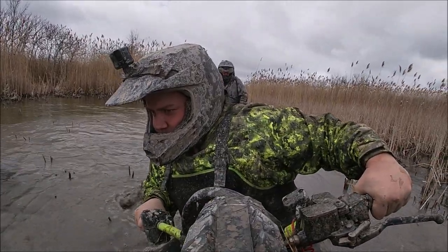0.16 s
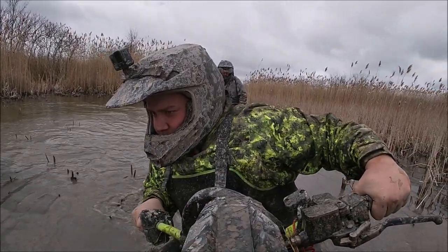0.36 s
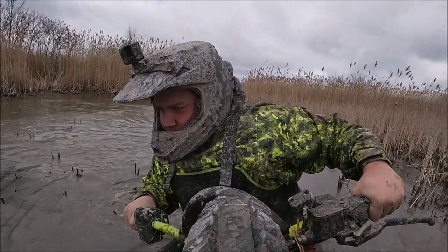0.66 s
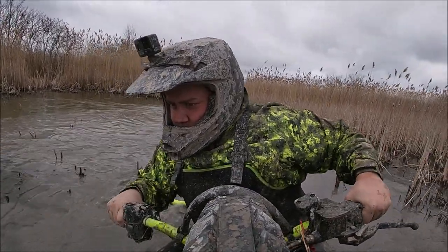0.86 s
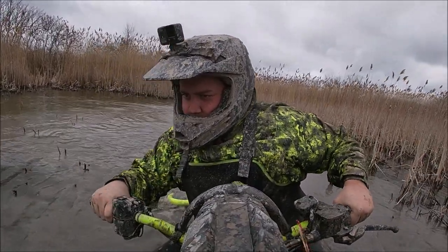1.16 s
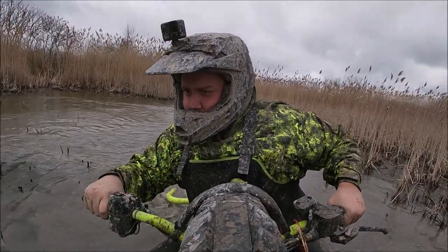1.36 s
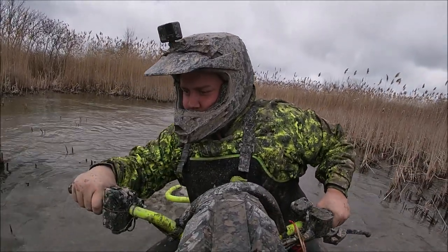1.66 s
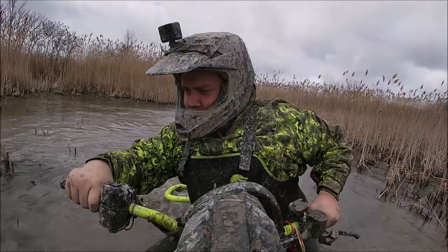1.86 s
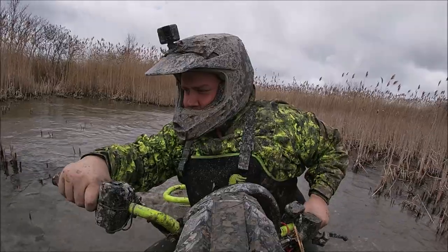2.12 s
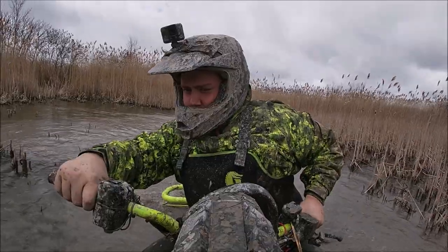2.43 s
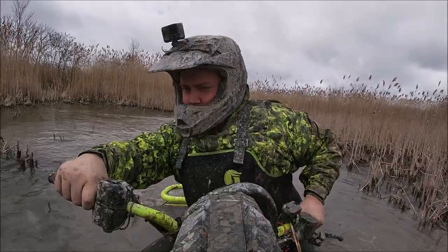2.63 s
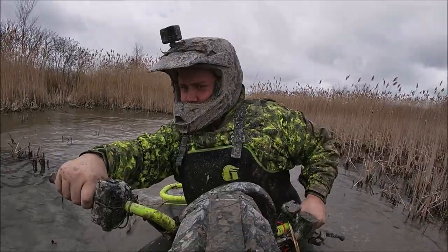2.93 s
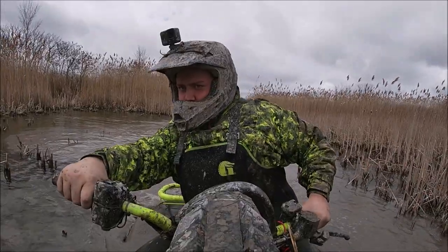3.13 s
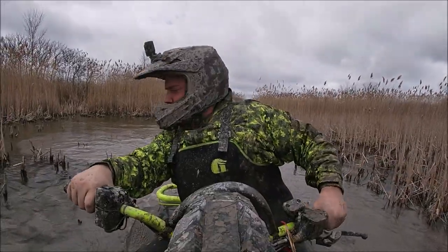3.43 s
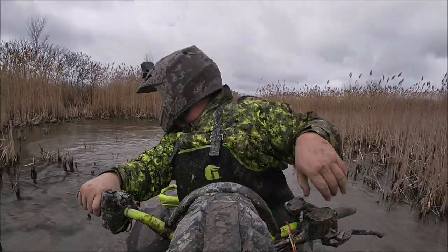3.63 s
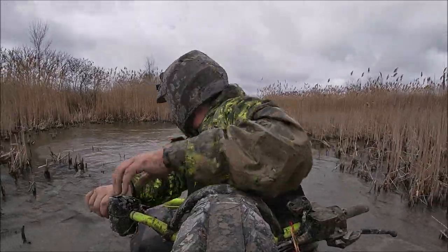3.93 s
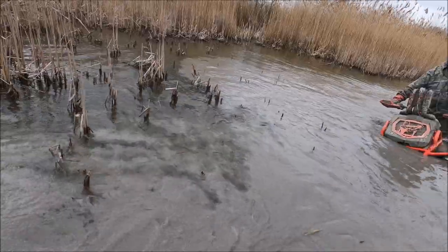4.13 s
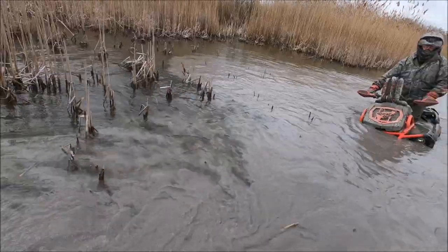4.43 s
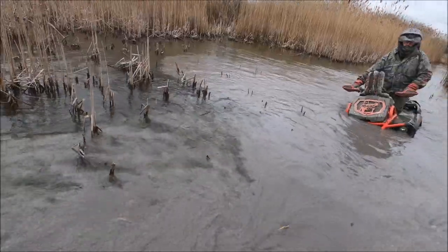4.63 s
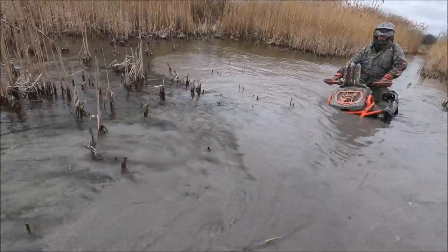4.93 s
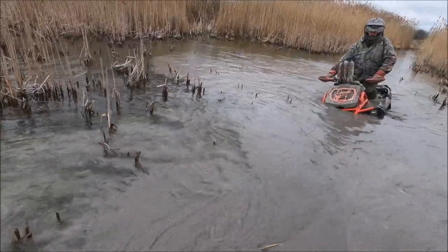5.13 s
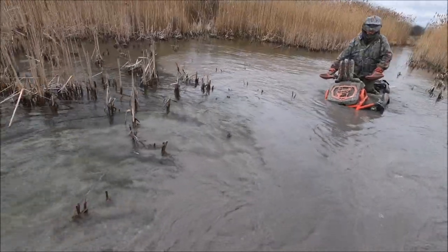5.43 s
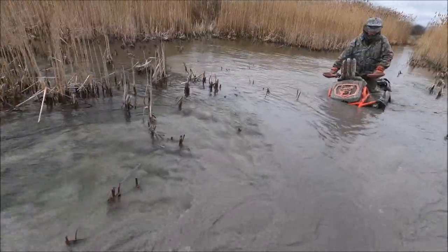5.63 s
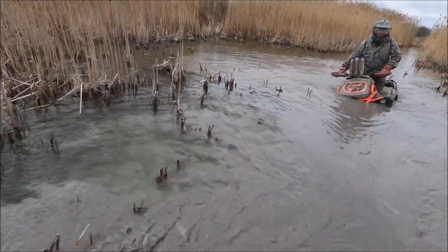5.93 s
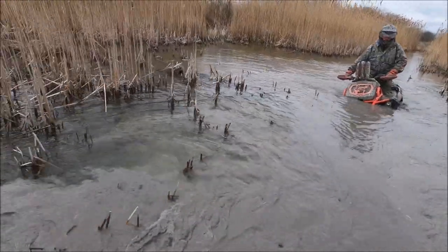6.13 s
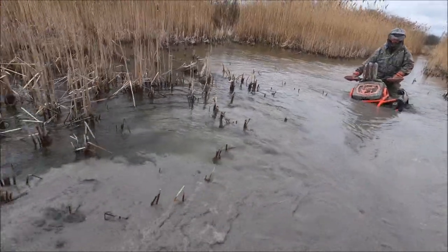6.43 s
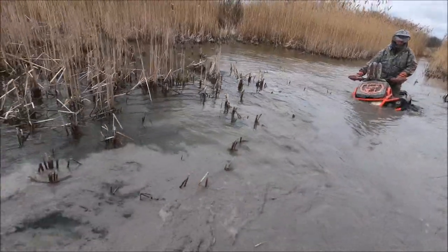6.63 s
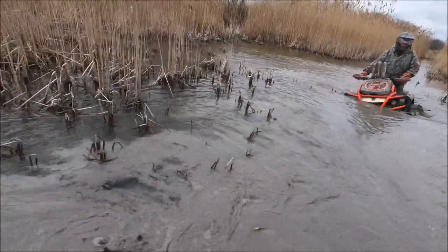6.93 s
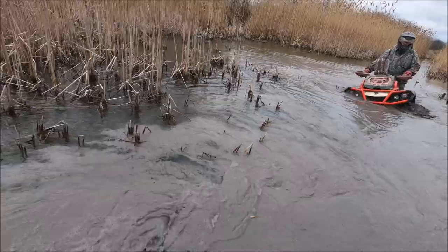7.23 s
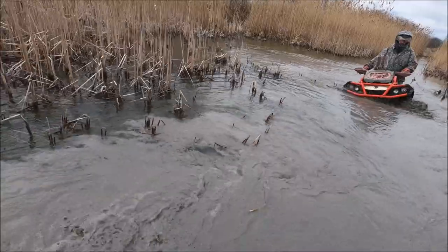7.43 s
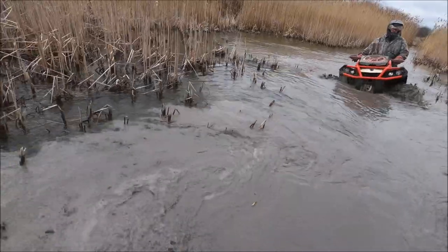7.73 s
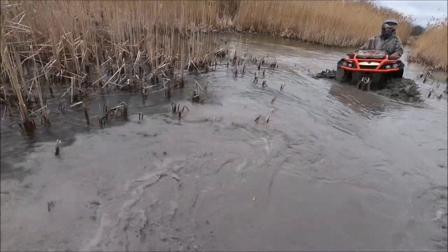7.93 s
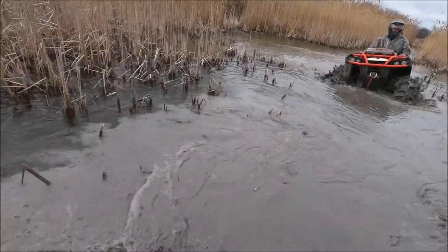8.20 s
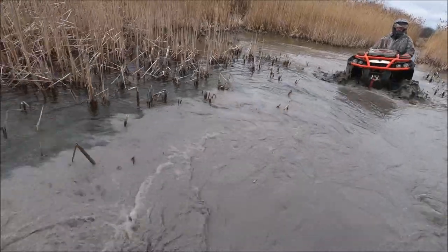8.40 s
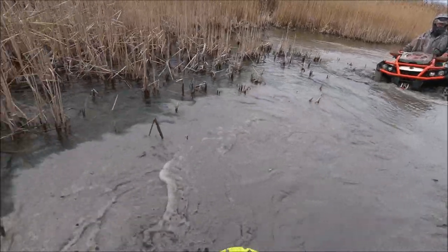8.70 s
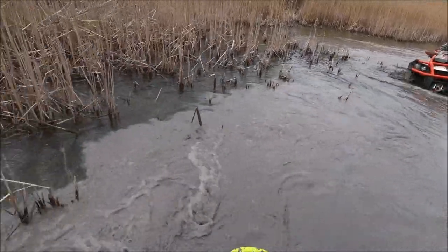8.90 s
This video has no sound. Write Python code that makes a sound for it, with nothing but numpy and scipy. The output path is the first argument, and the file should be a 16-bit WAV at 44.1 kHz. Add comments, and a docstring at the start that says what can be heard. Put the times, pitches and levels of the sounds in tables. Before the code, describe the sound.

A quad bike wades a reed-lined muddy pond. Heard from a microphone on the machine, its engine drones low and steady, the frame buzzing with a thin, slightly falling whine. After a sharp click, a second outdoor microphone takes over: the exhaust booms and barks more openly through water, with slosh, drips and spits. The engine briefly bogs down, recovers, then growls on at slightly lower speed with heavier splashing.

```python
"""A twin-cylinder quad bike wades through a muddy pond: pressure pulses timed by the engine cycle ring exhaust modes.
The throttle is nearly steady; stumbles delay the cycle and poor burns weaken single firings.
At first the microphone rides on the machine: its frame buzzes as resonant noise and a thin tone falls slowly.
Then, with a click, a second microphone takes over and the muffled exhaust barks more openly.
Shaped noise sloshes and sprays with the gas puffs; drops, spits, low rumble and faint echoes fill the rest."""
import sys
import numpy as np
from scipy import signal
from scipy.fft import rfft, irfft, next_fast_len
from scipy.io import wavfile
from scipy.ndimage import uniform_filter1d, minimum_filter1d, map_coordinates

SR = 44100
rng = np.random.default_rng(int(sys.argv[2]) if len(sys.argv) > 2 else 0)


def to_wav(sig):
    """Store sig (one row per channel, or 1-D mono) as 16-bit WAV at the path in sys.argv[1].

    Samples outside -1..1 are clipped; the rate is SR.
    """
    pcm = np.clip(np.atleast_2d(sig), -1, 1) * 32767
    pcm = np.round(pcm).astype(np.int16)
    wavfile.write(sys.argv[1], SR, pcm.T)  # frames by channels


N = 399546  # samples

SWITCH_S = 4.0409  # a second microphone takes over

# Engine speed before inertia. Each row: time in seconds, four-stroke cycles a second.
CYCLE_RATE = [(0, 33.57), (.3, 34.06), (.7, 32.55), (1.43, 30.93), (2.85, 31.21), (3.45, 29.63),
              (3.81, 30.58), (4.11, 29.68), (4.55, 30.53), (4.94, 31.22), (5.5, 30.23), (5.8, 30.77),
              (6.13, 32.38), (6.4, 28.01), (6.63, 22.4), (7.0, 28.42), (7.25, 30.85), (7.73, 28.46),
              (7.93, 28.92), (8.28, 27.45), (8.81, 27.31), (9.06, 26.49)]
# Three pressure pulses a cycle, each with a weaker answer. Each row: place in cycles, then the
# relative strength for boom, bark, crack and thud in dB.
PULSE_PATTERN = [(0.048, 6.5, 4, 2, 7), (0.233, -6, -9, -8, -19.5), (0.416, 13, 7, -7, 9.5),
                 (0.627, -27.5, -13.5, -4, -15), (0.701, 3.5, 0, -3, -1.5), (0.797, -24.5, -3, -11, -20.5)]
# Stereo difference. Each row: frequency in Hz, side against middle in dB.
SIDE_SPECTRUM = [(60, -29), (180, -27), (300, -26), (520, -23), (890, -17), (1520, -13), (2610, -11),
                 (5000, -9), (9000, -14)]


def amp(db):
    """Level and amplitude: 20 dB is a factor of ten."""
    return 10 ** (np.asarray(db) / 20)


def unit(x):
    """Normalisation by mean power: scales the whole signal to rms 1."""
    return x / np.sqrt(np.mean(x ** 2) + 1e-20)


def along(points, hz):
    """Logarithmic frequency scale: reads (Hz, value) points by interpolation."""
    f, v = np.transpose(points)
    return np.interp(np.log(hz + 1), np.log(f + 1), v)


def curves(rows):
    """Linear interpolation in time: one curve for each column after the seconds."""
    s, *cols = np.transpose(rows)
    return [np.interp(np.arange(N) / SR, s, c) for c in cols]


def bumps(rows, half_s):
    """Superposition of Gaussian humps, one for each (seconds, height) row."""
    return sum(height * np.exp(-((np.arange(N) / SR - s) / half_s) ** 2) for s, height in rows)


def wobble(rate):
    """Band-limited random fluctuation: a smooth curve through rate random knots a second."""
    knots = rng.standard_normal(int(N * rate / SR) + 4)
    return map_coordinates(knots, [np.arange(N) * rate / SR])


def filtered(x, response):
    """Linear filtering: the spectrum is multiplied by a complex response of frequency."""
    m = next_fast_len(N + SR // 2)
    return irfft(rfft(x, m) * response(np.fft.rfftfreq(m, 1 / SR)), m)[..., :N]


def modes(table):
    """Modal superposition: damped resonances (Hz, width Hz, dB) summed with alternating sign."""
    return lambda f: sum((-1) ** k * amp(db) * 1j * f * w / (c * c - f * f + 1j * f * w)
                         for k, (c, w, db) in enumerate(table))


def noise(response):
    """Partial coherence: independent middle and side noise, rms 1 in all, less alike in the treble."""
    both = lambda hz: response(hz) * [hz * 0 + 1, amp(along(SIDE_SPECTRUM, hz))]
    mid, side = filtered(rng.standard_normal((2, N)), both)
    return unit(np.array([mid + side, mid - side]))


def turns():
    """Phase is the integral of speed: engine cycles run through, with inertia and stumbles."""
    # The engine falls behind and catches up. Each row: time in seconds, cycles lost.
    stumbles = [(3.48, .045), (3.76, .025), (4.22, .035), (4.51, .03), (4.77, .03), (5.07, .035),
                (5.26, .02), (5.48, .025), (5.72, .022), (5.9, .03), (6.35, .025), (6.43, .025),
                (6.51, .028), (6.59, .03), (6.67, .028), (6.75, .025), (7.2, -.012), (7.56, -.018),
                (8.3, .012), (8.62, .015), (8.72, .028)]
    stumble_s, flywheel_s = .055, .14  # half length; inertia rounds off every change of speed
    start_cycles, skip_cycles = .12, .34  # the second microphone comes in further on in the cycle
    speed = uniform_filter1d(curves(CYCLE_RATE)[0], size=round(flywheel_s * SR))
    skip = skip_cycles * (np.arange(N) > SWITCH_S * SR)
    return start_cycles + np.cumsum(speed) / SR + skip - bumps(stumbles, stumble_s)


def firings(jitter, scatter_db):
    """Cyclic variation of combustion: sample, strength and place in the cycle of every pulse."""
    # Poor burns. Each row: time in seconds, change of pulse strength in dB.
    misses = [(1.618, -7.5), (2.264, -7.5), (2.902, -8), (3.047, -17.5), (3.451, -9), (4.732, -6.5),
              (5.051, -9.5), (5.214, -7.5), (5.641, -10), (6.066, -8.5), (6.267, -8.5), (6.87, -9.5),
              (8.354, -2)]
    cycles = turns()
    places = (np.arange(int(cycles[-1]))[:, None] + np.transpose(PULSE_PATTERN)[0]).ravel()
    chance = rng.standard_normal((len(places), 2))
    s = np.interp(places + jitter * chance[:, 0], cycles, np.arange(N) / SR)
    db = scatter_db * chance[:, 1]
    for when, miss_db in misses:  # weakens the pulses of about one cycle
        db = db + miss_db * np.exp(-((s - when + 0.0005) / 0.017) ** 2)
    at = np.round(s * SR).astype(int).clip(0, N - 1)
    heard = (s > 0) * (abs(s - SWITCH_S) > 2 / SR)  # none right at the switch
    return at, amp(db) * heard, np.arange(len(s)) % len(PULSE_PATTERN)


def exhaust():
    """Impulse excitation of resonators: pulses ring the pipe; also returns bare pulses and gas puffs."""
    # Level of each mode. Each row: time in seconds, then low boom, high boom, low bark, high bark
    # and crack in dB.
    main_levels = [(0, -34, -35, -42.5, -44, -41), (.9, -33, -37.5, -43, -44.5, -41.5),
                   (1.401, -53.5, -39, -42, -45.5, -46), (2.001, -35.5, -32.5, -49, -40, -42),
                   (2.501, -23.5, -36.5, -51.5, -42.5, -50.5), (3.1, -19.5, -38.5, -38, -39.5, -48),
                   (3.451, -18.5, -21.5, -38.5, -38, -65), (3.56, -20.5, -19.5, -45, -25.5, -65),
                   (4.02, -26, -18.5, -29, -30, -50.5), (4.099, -20, -17, -28, -33, -53),
                   (4.6, -24, -14, -30.5, -33.5, -48.5), (5.2, -25, -17, -26.5, -30, -52.5),
                   (5.501, -23.5, -18.5, -35, -23.5, -51), (6.25, -28.5, -18, -30.5, -28.5, -58.5),
                   (6.5, -25.5, -25, -26, -25, -62.5), (6.9, -24, -22, -24, -22, -44),
                   (7.05, -22.5, -25, -42.5, -24.5, -34), (7.75, -20.5, -28, -34, -27.5, -34.5),
                   (8.4, -24, -32.5, -29, -24.5, -41.5), (9.06, -21.5, -25, -25, -24.5, -46.5)]
    # Each row: time in seconds, then dull thud, middle bark and low, middle and high growl of the
    # pipe mouth in dB.
    growl_levels = [(0, -53, -53, -39.5, -62.5, -60.5), (3.2, -44, -45.5, -58.5, -57, -60.5),
                    (3.6, -42, -39.5, -54.5, -63.5, -73.5), (4.2, -37.5, -34.5, -49.5, -62.5, -67.5),
                    (4.7, -50.5, -34, -46, -61, -69.5), (5.2, -46, -34, -55.5, -60, -69),
                    (5.5, -54, -33.5, -61.5, -62, -57.5), (6.2, -42, -31.5, -59, -62.5, -62),
                    (6.6, -59, -39.5, -60.5, -64, -71), (7.0, -29.5, -32, -34.5, -59, -46),
                    (7.45, -41.5, -35, -35.5, -57.5, -53), (7.65, -38.5, -32, -38.5, -50, -63),
                    (8.1, -30.5, -32.5, -38, -42, -46.5), (8.35, -37, -32.5, -44.5, -72, -58.5),
                    (9.06, -36, -34.5, -36.5, -57, -44)]
    # Two booms of the silencer, two barks of the tail pipe, the crack of its mouth, before the
    # response is squared. Each row of a mode: centre in Hz, width in Hz, strength in dB.
    pipe_modes = [
        [(193.8, 36.6, -1)],
        [(228.9, 61.7, -1)],
        [(287, 190, -4), (342.4, 112, 6)],
        [(453.8, 96, 5), (604, 260, -14)],
        [(806, 340, 9.5), (1070, 510, 3), (1750, 3900, -11.5)],
    ]
    # Modes of the thud, middle bark and growls, with the same columns.
    mouth_modes = [
        [(341, 150, 0)],
        [(404, 160, 0)],
        [(682, 170, 0)],
        [(820, 170, 0)],
        [(1020, 240, 0)],
    ]
    # How far each mode speaks ahead of the pulse, in seconds.
    ahead = [.0035, .003, .0045, .0012, .0012, .0045, .003, .001, .001, .001]
    # Pulse balance. Each row: time in seconds, bark and crack of the second pulse in dB, bark, crack
    # and thud of the third pulse in dB, boom of the third pulse in dB.
    lead = [(0, -3, -1, -4.5), (3.502, -3, -2.5, -1.5), (4.599, -11, 0.5, -2), (6.201, -5.5, -9.5, -11.5),
            (6.449, -3.5, -1.5, -4.5), (6.949, -7, 2, 2), (7.151, -3, -11.5, -13), (7.9, -2.5, -1, -4),
            (8.301, -9.5, 2.5, -4), (9.06, -10, 1.5, -6.5)]
    # The third pulse and its answer come sooner. Each row: time in seconds, advance in cycles.
    third_early = [(0, 0), (6.2, 0), (6.9, .02), (7.2, .005), (8, .005), (8.4, .012), (9.06, .012)]
    # The pipe mouth clears the water and the crack and upper growls lift, or dip where negative.
    # Each row: time in seconds, lift in dB.
    flares = [(4.37, 11), (4.89, 9.5), (5.25, 8.5), (5.44, 3), (5.62, 9.5), (5.82, 14), (5.9, 6.5),
              (5.995, 9.5), (6.22, -5), (7.9, 2.5), (8.12, 0), (8.78, 7.5)]
    # The high boom swells briefly. Each row: time in seconds, lift in dB.
    swells = [(.7, 6), (.95, 15.5), (3.0, 22), (3.27, 9)]
    flare_s, swell_s = 0.036, 0.026  # half lengths
    unsteady_db = 1.3  # each mode swells and sinks on its own as the water laps at the pipe
    bark_scatter_db, crack_scatter_db, puff_scatter_db = 2, 1.6, 1.5  # from pulse to pulse

    at, size, place = firings(jitter=.002, scatter_db=1.2)
    pair = place // 2  # a pulse and its answer
    second_db, third_db, boom_db = (c[at] * (pair == k) for k, c in zip([1, 2, 2], curves(lead)))
    soon = curves(third_early)[0][at] * (pair == 2)
    at = (at - np.round(soon * SR / curves(CYCLE_RATE)[0][at]).astype(int)).clip(0, N - 1)
    balance_db = [boom_db, second_db + third_db, second_db + third_db, third_db]
    boom, bark, clean, thud = size * amp(np.transpose(PULSE_PATTERN)[1:, place] + balance_db)
    bark = bark * amp(bark_scatter_db * rng.standard_normal(len(at)))
    crack = clean * amp(crack_scatter_db * rng.standard_normal(len(at)))

    out = np.zeros(N)
    levels = np.array(curves(main_levels) + curves(growl_levels))
    levels[1] += bumps(swells, swell_s)
    levels[[4, 8, 9]] += bumps(flares, flare_s)  # crack, middle and high growl
    strengths = (boom, boom, bark, bark, crack, thud, bark, clean, clean, clean)
    for table, db, strength, ahead_s in zip(pipe_modes + mouth_modes, levels, strengths, ahead):
        ring = modes(table)
        rounded = lambda f: 1 / (1 + 1j * f / (2.34 * table[-1][0])) ** 3  # water blunts the front
        advance = lambda f: np.exp(2j * np.pi * f * ahead_s)
        response = lambda f: ring(f) ** 2 * rounded(f) * advance(f)  # squared: gas column and shell
        voice = unit(filtered(np.bincount(at, strength, N), response))
        out += amp(db + unsteady_db * wobble(7.5)) * voice

    uneven = amp(puff_scatter_db * rng.standard_normal(len(at)))
    decay = np.exp(-1 / (0.0038 * SR))  # 3.8 ms
    puffs = signal.lfilter([1], [1, -decay], np.bincount(at, clean * uneven, N))
    for _ in range(2):  # the gas takes a moment to break the surface
        puffs = uniform_filter1d(puffs, size=130, origin=60)
    return out, np.bincount(at, bark, N), unit(puffs)


def shake():
    """Engine orders: slightly unsteady harmonics of the cycle rate."""
    # Each row: time in seconds, then the shake at 1, 2, 3, 4 and 5 times the cycle rate in dB.
    order_levels = [(0, -31, -29, -46, -23, -41), (1.1, -43, -29, -31, -25, -60),
                    (2.1, -35, -42.5, -24, -29.5, -50), (3.1, -47, -40, -32, -28, -42.5),
                    (3.55, -49.5, -49, -42.5, -44.5, -40.5), (4.03, -44, -42, -45, -46.5, -45),
                    (4.07, -42, -33.5, -29, -38, -49), (6.2, -45.5, -36, -34, -44.5, -58),
                    (6.6, -51.5, -42, -30, -37.5, -28.5), (7.3, -44, -31, -31.5, -43, -32.5),
                    (9.06, -53.5, -35.5, -34.5, -33.5, -25)]
    cycles = turns() - .39
    out = np.zeros(N)
    for order, db in enumerate(curves(order_levels), 1):
        tone = np.sin(2 * np.pi * order * cycles + .1 * wobble(12))  # phase wavers, radians
        out += np.sqrt(2) * amp(db + .9 * wobble(12)) * tone
    return out


def whine():
    """Frequency modulation: a thin falling tone on the machine, unsteady in pitch and level."""
    # Each row: time in seconds, frequency in Hz, level in dB.
    whine_path = [(.9, 1072, -56), (1.05, 1050, -47), (1.3, 1042, -53), (1.75, 1057, -47),
                  (2.2, 1031, -48.5), (2.8, 1019, -48), (3.1, 1020, -58), (3.3, 1010, -84.5)]
    hz, db = curves(whine_path)
    before_db = -30 * (np.arange(N) < .8 * SR)  # fainter before 0.8 s
    phase = 2 * np.pi * np.cumsum(hz + 4 * wobble(18)) / SR
    return np.sqrt(2) * amp(db + before_db + 2.5 * wobble(14)) * np.sin(phase)


def frame(blows, puffs):
    """Structure-borne sound: panels ring to noise and pulses, one set fading to another as the bars turn."""
    # Frame buzz as a whole. Each row: time in seconds, gain in dB, share of the second panel set (0-1).
    buzz_path = [(0, -36, 0.16), (1, -38.5, 0.36), (1.15, -38, 0.9), (2.9, -38.5, 0.94), (3.45, -43.5, 1),
                 (3.55, -47, 0.8), (4.03, -49.5, 1)]
    # Two sets of panel resonances. Each row: centre in Hz, width in Hz, strength in dB.
    first_panels = [(680, 15, -0.5), (810, 55, -4), (1460, 59, -5), (1797, 17, -12), (2030, 32, -18.5),
                    (2356, 31, -17), (2820, 24, -20), (3277, 33, -17), (4700, 50, -24.5)]
    second_panels = [(675, 11, 7), (812, 42, 2), (1010, 150, -7), (1251, 18, -3.5), (1570, 35, -9),
                     (1770, 16, -8), (3180, 510, -22.5), (4900, 290, -33)]
    # Rattle of fittings under the panels. Each row: frequency in Hz, relative density in dB per Hz.
    rattle_spectrum = [(150, -32), (250, 2.5), (410, -8), (700, 0.5), (1000, -39), (1300, -17.5),
                       (2000, -22), (3000, -29.5), (4600, -36), (5500, -38), (7500, -58), (10000, -53),
                       (13000, -80), (16000, -88.5)]
    struck_db = -5  # panels struck by the firings, against their noisy buzz
    db, share = curves(buzz_path)
    share = np.clip(share, 0, 1)

    def panels(table):
        """Two excitations of the same resonances: steady noise and the bare pulses."""
        steep = lambda f: modes(table)(f) / (1 + (f / 5500) ** 4)
        return noise(steep) + amp(struck_db) * unit(filtered(blows, steep))

    ring = np.sqrt(1 - share) * panels(first_panels) + np.sqrt(share) * panels(second_panels)
    rattle = noise(lambda hz: amp(along(rattle_spectrum, hz)))
    buzz = amp(-1.5 + 0.61 * wobble(12)) * ring * unit(1 + 0.44 * puffs)
    buzz = buzz + amp(4.0) * rattle * unit(1 + 0.57 * puffs)
    return amp(db) * (np.arange(N) < SWITCH_S * SR) * buzz  # gone at the switch


def water(blows, puffs):
    """Amplitude modulation of noise: gas puffs push slosh and spray, with drops and spits on top."""
    # Each row: time in seconds, slosh in dB, spray in dB.
    water_levels = [(3.4, -89.5, -79), (3.55, -79.5, -79.5), (4.02, -50, -71), (4.1, -48.5, -76),
                    (4.25, -46.5, -84), (4.45, -49.5, -76.5), (4.8, -50.5, -81), (5.4, -54.5, -82),
                    (5.8, -52.5, -87.5), (5.9, -45, -95), (6.0, -51.5, -78), (6.25, -50.5, -77),
                    (6.4, -53, -76.5), (7, -48.5, -63), (7.45, -47.5, -71), (7.6, -47, -59.5),
                    (7.75, -42, -53), (7.95, -44.5, -55.5), (8.12, -44, -59), (8.25, -47, -61.5),
                    (9.06, -45, -63.5)]
    # Spectra of slosh and spray. Each row: frequency in Hz, relative density in dB per Hz.
    slosh_spectrum = [(350, -34), (700, -3), (1000, 3), (1500, -6), (2200, -13), (3000, -17.5),
                      (4000, -24.5), (6500, -33.5), (9000, -40.5), (15000, -56.5)]
    spray_spectrum = [(1200, -22.5), (2200, -12.5), (3000, -7), (4300, -5.5), (5500, -9), (6600, -12.5),
                      (7500, -12.5), (9000, -25), (12500, -32.5), (15500, -52)]
    # The spray sings at these. Each row: centre in Hz, width in Hz, lift in dB.
    sizzle = [(1680, 70, 6), (2090, 160, 3), (3820, 200, 9), (4330, 240, 8), (4800, 180, 7), (6640, 350, 8)]
    # Level of the drops. Each row: time in seconds, level in dB.
    drop_levels = [(4.03, -78), (4.08, -56.5), (5.3, -61), (5.5, -71), (6.5, -66.5), (7.4, -73.5),
                   (7.9, -51.5), (8.3, -75.5), (9.06, -65)]
    spray_lag_s, spray_spread_s = .021, .005  # spray falls back after each puff, and smeared
    slosh_db, spray_db = curves(water_levels)
    lapping = amp(2.1 * wobble(25) + 0.96 * wobble(3.4))
    slosh = unit(noise(lambda hz: amp(along(slosh_spectrum, hz))) * (1 + 1.5 * puffs) * lapping)
    late = np.roll(puffs, round(spray_lag_s * SR))
    late = unit(uniform_filter1d(late, size=round(spray_spread_s * SR)))
    singing = lambda hz: sum(db / (1 + (2 * (hz - c) / w) ** 2) for c, w, db in sizzle)
    hiss = noise(lambda hz: amp(along(spray_spectrum, hz) + singing(hz)))
    spray = unit(hiss * (1 + 9.4 * late) * amp(3.2 * wobble(35)))
    falling = amp(curves(drop_levels)[0]) * drops(blows)
    return amp(slosh_db) * slosh + falling + amp(spray_db) * spray + spits()


def drops(blows):
    """Damped oscillation: every pulse flicks three drops out of the pipe, each a tick of its own pitch."""
    drop_hz, spread, drop_cycles = 2200, .27, 2.2  # median pitch, its log spread, decay in periods
    delay_s, scatter_db = .005, 2.5  # mean wait after the pulse; level scatter from drop to drop
    at = np.repeat(np.flatnonzero(blows), 3)
    chance = rng.standard_normal((len(at), 2))
    wait = rng.exponential(delay_s * SR, len(at))
    hz, t = drop_hz * np.exp(spread * chance[:, :1]), np.arange(SR // 150) / SR
    u = t * hz / drop_cycles
    size = blows[at] * amp(scatter_db * chance[:, 1])
    ticks = size[:, None] * u * np.exp(-2 * u) * np.sin(2 * np.pi * hz * t)
    where = (at + wait.astype(int))[:, None] + np.arange(len(t))
    return unit(np.bincount(where.ravel(), ticks.ravel(), N)[:N])


def spits():
    """Band-limited noise bursts: water spat out or flicked against the machine, higher ones dying faster."""
    # Each row: start in seconds, burst gain in dB before its envelope and the low-pass, pitch in Hz.
    spit_events = [(1.768, -48, 3700), (1.83, -56, 4000), (3.4585, -33, 5100), (4.1021, -33.5, 2200),
                   (4.2043, -46, 1530), (4.2363, -37.5, 1900), (4.369, -50, 1550), (4.4014, -38, 1970),
                   (4.4465, -47, 1560), (4.5345, -36.5, 1850), (4.6648, -43, 1510), (4.8289, -36, 1530),
                   (5.1801, -49, 1460), (5.8331, -48, 1690), (5.9618, -50, 1530), (6.4284, -51, 1520),
                   (5.09, -51, 6720), (6.43, -50, 4570), (6.6245, -34, 6600), (7.18, -50.5, 1500),
                   (7.2779, -40, 1570), (7.312, -36.5, 1540), (7.5438, -39, 1620), (7.647, -34, 1680),
                   (7.6815, -40.5, 1490), (7.8225, -33, 1630), (7.8785, -31.5, 1710), (8.1235, -41.5, 1550),
                   (8.5738, -35, 1720)]
    out, t = np.zeros(N + SR), np.arange(SR // 50) / SR
    for s, db, hz in spit_events:
        band = signal.butter(1, [hz * 0.92, hz * 1.22], "band", fs=SR)
        burst = unit(signal.lfilter(*band, rng.standard_normal(len(t))))
        attack = 1 - np.exp(-t / 0.00039)
        out[round(s * SR):][:len(t)] += amp(db - 60 * t * hz / 50) * burst * attack  # 60 dB in 50 periods
    return filtered(out[:N], lambda hz: 1 / (1 + 1j * hz / 5000) ** 3)


def rumble():
    """Broadband low-frequency noise: machine and mud churn between the engine orders."""
    # Each row: frequency in Hz, relative density in dB per Hz.
    rumble_spectrum = [(8.8, -50.5), (15, -35.5), (75, -5.5), (129, -7), (167, -5.5), (392, -17),
                       (524, -15), (700, -19.5), (910, -46), (1540, -120)]
    # Each row: time in seconds, level in dB.
    rumble_levels = [(0, -29.5), (3, -32), (3.5, -32.5), (4.1, -39), (6.2, -29.5), (7.2, -30),
                     (9.06, -27.5)]
    churn = noise(lambda hz: amp(along(rumble_spectrum, hz)))
    return amp(curves(rumble_levels)[0] + 1.5 * wobble(6)) * churn


def reeds(x):
    """Diffuse scattering: weak echoes off the reed banks, opposite in the two channels."""
    t = np.arange(SR // 20) / SR
    tail = unit(rng.standard_normal(len(t)) * amp(-60 * t / .06)) / np.sqrt(len(t))  # 60 dB in 60 ms
    echo = signal.fftconvolve(x, tail)[:N]
    side = filtered(echo, lambda hz: amp(along(SIDE_SPECTRUM, hz) - 6.5))
    return np.array([side, -side])


def click():
    """Step with exponential decay: the sound jumps once, sharply."""
    # One row: start in seconds, peak in dB, fall time constant in seconds.
    jump_s, peak_db, fall_s = (4.0409, -16, .0002)
    after = np.arange(N) / SR - jump_s
    return amp(peak_db) * (after > 0) * np.exp(-abs(after) / fall_s)


def scene():
    """Linear superposition of all sources; the engine sits in the middle."""
    pipe, blows, puffs = exhaust()
    engine = pipe + shake()
    machine = engine + whine() + frame(blows, puffs)
    return machine + water(blows, puffs) + rumble() + reeds(engine) + click()


def record(dry):
    """Peak limiting, inter-channel level and time difference, stereo opening and a band limit."""
    # The sound opens from mono to stereo. Each row: time in seconds, gain of the side signal in dB.
    opening = [(5.6, -58), (5.72, -27), (5.85, -14), (6.6, -2), (7.1, 1.5), (9.06, 5.5)]
    ceiling, hold_s, top_hz = .39, .012, 15200  # peak amplitude; limiter window; band limit
    left_db, left_lag_s = .3, 1.4e-5  # left is a little louder and later, ahead of the opening
    hold = round(hold_s * SR)
    need = np.minimum(1, ceiling / (np.abs(dry).max(0) + 1e-9))
    gain = uniform_filter1d(minimum_filter1d(need, size=2 * hold), size=hold)
    port = lambda hz, way: amp(way * left_db / 2) * np.exp(-1j * np.pi * way * hz * left_lag_s)
    left, right = filtered(dry * gain, lambda hz: [port(hz, 1), port(hz, -1)])
    mid, side = (left + right) / 2, (left - right) / 2 * amp(curves(opening)[0])
    return filtered(np.array([mid + side, mid - side]), lambda hz: hz < top_hz)


dry = scene()
out = record(dry)
to_wav(out)
```